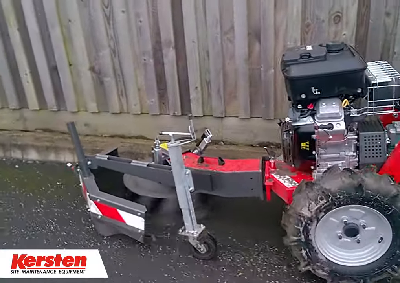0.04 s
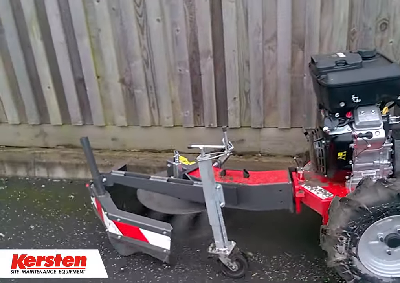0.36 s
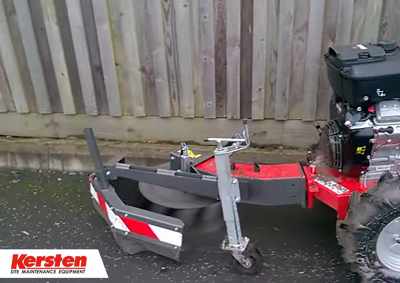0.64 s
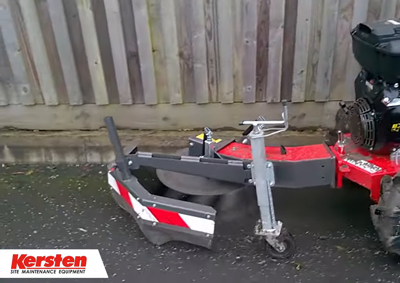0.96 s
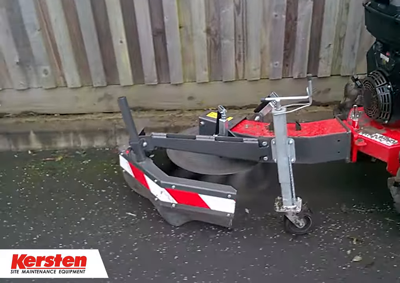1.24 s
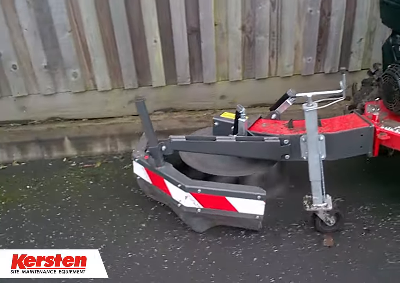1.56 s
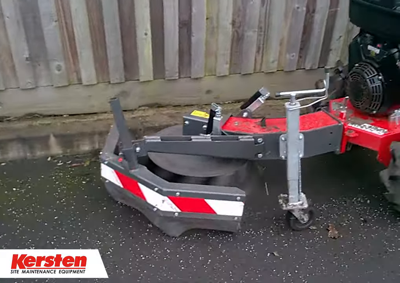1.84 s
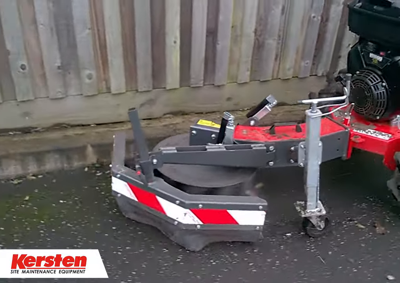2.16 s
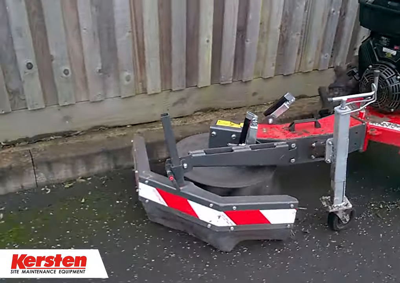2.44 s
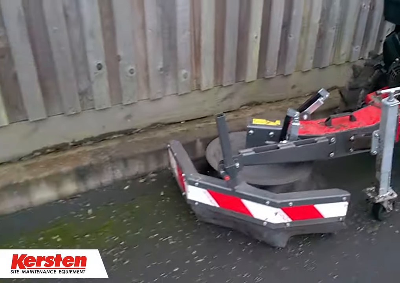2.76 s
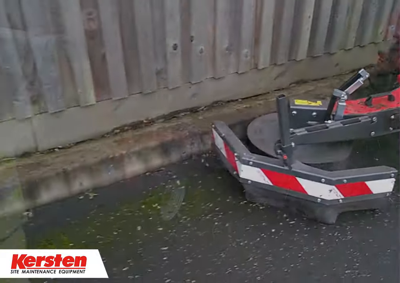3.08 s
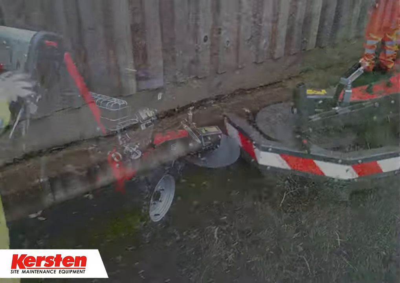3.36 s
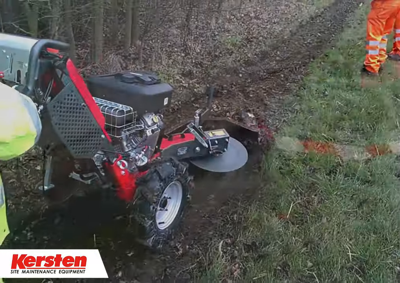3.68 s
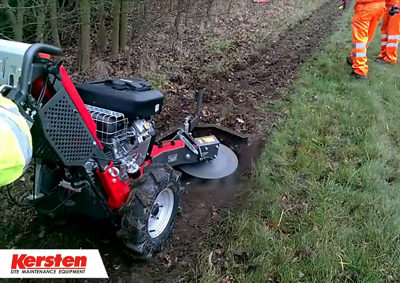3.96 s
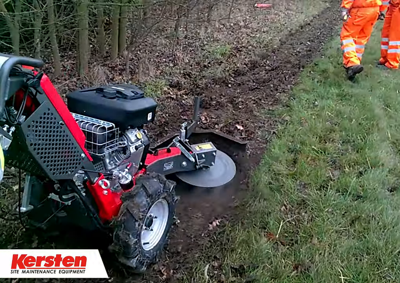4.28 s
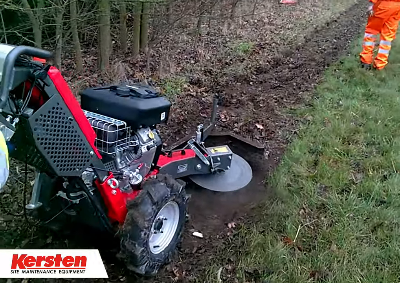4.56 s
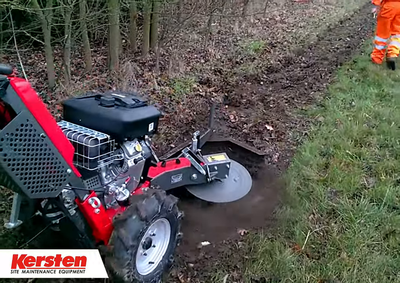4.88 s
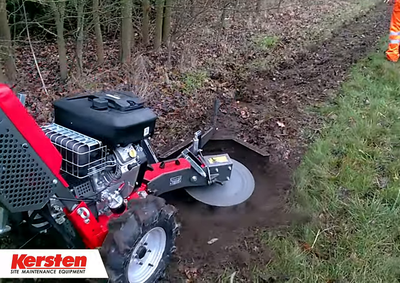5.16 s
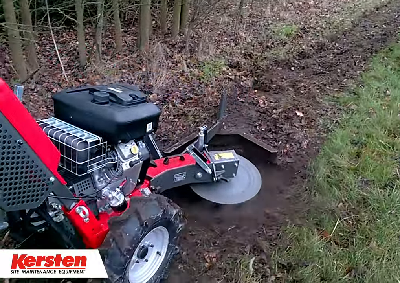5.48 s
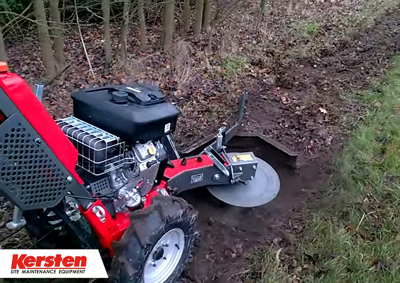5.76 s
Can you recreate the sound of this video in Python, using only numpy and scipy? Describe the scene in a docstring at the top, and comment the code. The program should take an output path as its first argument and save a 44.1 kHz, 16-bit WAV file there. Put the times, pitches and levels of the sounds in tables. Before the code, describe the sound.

From the start, a walk-behind weed brush is heard from the front, outdoors at a kerb. Its twin-cylinder engine throbs low and steady while steel wires scour the asphalt, the bright hiss pulsing about seven times a second with faint metallic ringing. Light gusts nudge the microphone. At about 2.4 seconds everything stops dead, leaving silence. Just before 3 seconds the machine fades quickly back in on a soft verge, closer to the exhaust and louder, with a limping beat, hissing gas and mechanical clatter. The brush swishes softly through soil and leaves, digging in around 4.4, 4.7 and 5.9 seconds. The engine speed dips and recovers slightly as the ground drags at it. Sharp exhaust barks come now and then, hardest from about 4.6 to 5.7 seconds, and the engine keeps labouring until the end, near 6 seconds.

```python
"""A wire brush scours asphalt along a kerb, hissing once a turn over the throb of a V-twin engine.
It is a walk-behind weed brush, heard from the front, with wind nudging the microphone.
The sound stops dead. After a short silence the machine fades in on a soft verge, close by on the
silencer's side: the exhaust barks under load and the brush swishes through soil and leaves."""
import sys
import numpy as np
from scipy import signal
from scipy.fft import rfft, irfft, next_fast_len
from scipy.io import wavfile
from scipy.ndimage import map_coordinates

SR = 44100
rng = np.random.default_rng(int(sys.argv[2]) if len(sys.argv) > 2 else 0)


def wrap_up_sound(samples):
    """Save the sound to the file named by the first command line argument, as 16-bit audio."""
    columns = np.atleast_2d(samples).T
    # keep every value between -1 and 1, then stretch to whole-number steps
    tamed = np.clip(columns, -1, 1)
    steps = np.round(tamed * 32767).astype(np.int16)
    wavfile.write(sys.argv[1], SR, steps)


N = 261072
TIME = np.arange(N) / SR
KERB_HZ, CRUISE_HZ = 24.81, 24.5  # four-stroke cycles a second: governed at the kerb, nominal on the verge
BRUSH_TURNS_PER_CYCLE = .3

# One exhaust puff from the silencer's side. Each row: frequency in Hz, gain in dB.
PUFF_FROM_SIDE = [(10, -68), (25, -23), (48, 3), (75, -2), (122, 1.5), (150, -5), (195, -13.5), (243, -2),
                  (270, -8.5), (310, -15.5), (400, -31), (700, -32), (1500, -68)]


def brush_on_asphalt(cycles):
    """Steel wires scour asphalt, biting harder once a turn as the brush is tilted; disc and guard ring."""
    # How hard the brush presses. Each row: time in seconds, relative level in dB.
    contact = [(0, 0.2), (.42, 0), (.8, -3.5), (1.05, -2.5), (1.36, -5.5), (2, -2.5), (2.36, -5)]
    # The wires' scrape and their finest hiss. Each row: frequency in Hz, gain in dB.
    scrape_spectrum = [(160, -18), (300, -8), (520, -7), (640, -9.5), (850, -7.5), (1300, -10),
                       (2000, -5.5), (2900, -6.5), (3800, -5), (5000, -7), (7000, -5), (10300, -8.5),
                       (13500, -10.5), (16000, -15)]
    fine_spectrum = [(5000, -35), (8500, -3.5), (10300, 2), (12800, -2), (14300, -5.5), (16000, -11.5)]
    # The steel disc and the sheet-metal guard. Each row: resonance in Hz, width in Hz, gain in dB.
    disc_modes = [(437.5, 34, 0)]
    guard_modes = [(556, 65, -3), (786, 87, -1), (962, 35, -0.5)]
    contact_db, = curves(contact)
    bite = np.cos(2 * np.pi * (BRUSH_TURNS_PER_CYCLE * cycles - .4))
    pressure = amp(1.3 * bite + .35 * wobble(70))
    scrape = amp(-31 + .4 * contact_db) * grains(scrape_spectrum, rate=24000, spread_db=.5)
    fine = amp(-32.5 + contact_db) * noise(fine_spectrum)
    disc = amp(-44 + 2.2 * contact_db + .99 * bite) * ringing(disc_modes)
    guard = amp(-49) * ringing(guard_modes)  # steadily flicked by the wires
    return pressure * (scrape + fine) + disc + guard


def kerb_exhaust(first, second):
    """The twin throbs from the front, growing slightly as the machine draws level with the microphone."""
    # One puff from the front. Each row: frequency in Hz, gain in dB.
    front_puff = [(10, -35), (25, -11), (48, 5), (75, -1), (125, -5.5), (150, -8.5), (200, -6.5),
                  (260, -18.5), (325, -20), (600, -37.5), (1500, -72.5)]
    beat = puffs(first, second, first_db=-2.5, scatter_db=0)
    side_share = np.clip(.23 * (TIME - 1.6), 0, 1)  # the silencer starts to come into view
    direct = (1 - side_share) * colour(beat, front_puff) + side_share * colour(beat, PUFF_FROM_SIDE)
    fence_echo = np.interp(TIME - .0082, TIME, direct)  # thrown back by a wooden fence
    return amp(-37 + .3 * TIME) * unit(direct + .35 * fence_echo)


def verge_exhaust(first, second, sag, load):
    """Puffs close to the silencer; an open throttle makes each steeper and richer in overtones."""
    # One puff at full load. Each row: frequency in Hz, gain in dB.
    loaded_puff = [(10, -48), (25, -22), (48, 4), (75, -1), (122, 1.5), (150, -5.5), (195, -2), (243, 1),
                   (268, -4), (305, -10.5), (335, -6.5), (400, -46), (700, -35), (1500, -65)]
    beat = puffs(first, second, first_db=-1.5, scatter_db=.5)
    throb = (1 - load) * colour(beat, PUFF_FROM_SIDE) + load * colour(beat, loaded_puff)
    return amp(-32.5 - .1 * sag) * unit(throb)


def barks(first, sag, load):
    """The first cylinder's blowdown cracks in the silencer, harder when the engine is dragged down."""
    # The hardest firings. Each row: time in seconds, relative level in dB.
    hardest = [(3.255, -20), (3.463, -14.5), (3.545, -17), (4.036, -18), (4.608, -16), (4.694, -18.5),
               (4.735, -13.5), (4.777, -12.5), (4.819, -13.5), (5.113, -12.5), (5.282, -12), (5.365, -14.5),
               (5.447, -11.5), (5.614, -16), (5.655, -13)]
    # The crack in the silencer. Each row: frequency in Hz, gain in dB.
    spectrum = [(150, -17), (400, -19), (580, -6), (740, -14), (860, -2), (960, 4), (1120, -2),
                (1330, -0.5), (1650, -6.5), (2050, -6.5), (2400, -26), (6000, -33), (16000, -51)]
    effort_db = -24 + 4 * load + 4 * sag
    size_db = np.interp(first, TIME, effort_db) + 1.1 * rng.standard_normal(len(first))
    for s, db in hardest:
        size_db[np.argmin(abs(first - s))] = db
    spikes = impulses(first + .0028, amp(size_db))  # just behind the front of the puff
    crack = -colour(spikes, spectrum)
    gas = bursts(spikes, rise=.00038, decay=.0017) * noise(spectrum)
    return amp(23.5) * crack + amp(-12) * gas


def hiss_and_clatter(first, second, sag, load):
    """Gas rushes through the outlet for some milliseconds after each puff, over the engine's clatter."""
    # The outlet's hiss and the clatter. Each row: frequency in Hz, gain in dB.
    hiss_spectrum = [(1180, -28), (2000, -7), (2380, -8.5), (2570, -4.5), (4990, -3.5), (6760, -7.5),
                     (7840, -3.5), (9920, -3), (15100, -15), (16000, -19)]
    clatter_spectrum = [(150, -5.5), (370, -4.5), (450, -4.5), (600, -1), (740, -3.5), (950, 1), (1500, -1),
                        (2000, -4.5), (2800, -10.5), (6000, -35.5)]
    spits = puffs(first + .0021, second + .0022, first_db=1.5, scatter_db=1.5)
    flow = bursts(spits, rise=.0017, decay=.0023)
    hiss = amp(-36.5 + 2.5 * load) * unit(1 + .97 * flow) * noise(hiss_spectrum)
    clatter_gain = amp(-38.5 + 2.5 * load + .5 * sag) * unit(1 + .11 * flow)
    return hiss + clatter_gain * grains(clatter_spectrum, rate=6000, spread_db=1)


def brush_in_soil(cycles):
    """The brush skims soil and leaves, swishing once a turn and digging in now and then."""
    # Each row: middle of a dig in seconds, length in seconds, relative level in dB.
    digs = [(4.4, 0.27, -38.5), (4.67, 0.4, -36), (5.88, .5, -38.5)]
    # Swept soil. Each row: frequency in Hz, gain in dB.
    spectrum = [(1500, -21), (4000, -3.5), (7000, -8), (10500, -3), (12500, -4.5), (16000, -14.5)]
    bite = np.cos(2 * np.pi * BRUSH_TURNS_PER_CYCLE * cycles)
    pressure = amp(-2 + 1.2 * bite + 1.1 * wobble(25))
    return swells(digs, floor_db=-45) * pressure * grains(spectrum, rate=12000, spread_db=3.5)


def wind():
    """Low lumps of air on the microphone at the kerb, and a faint steady rumble on the verge."""
    # Each row: middle of a gust in seconds, length in seconds, relative level in dB.
    gusts = [(.1, .24, -44), (.6, 0.33, -42), (1.05, 0.38, -40.5), (1.31, 0.49, -54), (1.79, .32, -39.5)]
    # Air buffeting the microphone. Each row: frequency in Hz, gain in dB.
    buffet = [(12, -28), (30, -6.5), (55, -3), (100, -4), (180, -9.5), (350, -29), (900, -61.5)]
    lumps = swells(gusts, floor_db=-46.5) * amp(-2 + .8 * wobble(16)) * noise(buffet)
    rumble = amp(-56 + 1.2 * wobble(8)) * noise(buffet)
    return lumps, rumble


def kerb():
    """At the kerb, microphone ahead of the machine: the governor holds the engine steady."""
    cycles, first, second = firings(KERB_HZ + .05 * wobble(8), start=.039, lag=.37)
    return kerb_exhaust(first, second) + brush_on_asphalt(cycles)


def verge():
    """On the verge, microphone close to the silencer: the engine labours as the ground drags at it."""
    # Engine speed. Each row: time in seconds, four-stroke cycles a second.
    engine_speed = [(2.95, 24.81), (3.38, 24.12), (3.82, 24.67), (4.04, 23.89), (4.3, 25.19), (4.62, 23.61),
                    (4.85, 23.92), (5.18, 23.5), (5.34, 24.36), (5.55, 23.98), (5.92, 24.59)]
    # Each row: time in seconds, throttle opening from 0 to 1.
    throttle = [(3, 0), (4.4, 0.16), (4.62, 0.6), (5.2, 0.87), (5.9, 0.95)]
    speed, = curves(engine_speed)
    load, = curves(throttle)
    sag = CRUISE_HZ - speed
    cycles, first, second = firings(speed, start=2.968, lag=.362)
    engine = verge_exhaust(first, second, sag, load) + hiss_and_clatter(first, second, sag, load)
    return engine + brush_in_soil(cycles) + barks(first, sag, load)


def firings(speed, start, lag):
    """Cycle count and both cylinders' firing times; the second follows lag of a cycle behind the first."""
    cycles = np.cumsum(speed) / SR
    cycles -= np.interp(start, TIME, cycles)
    whole = np.arange(np.ceil(cycles[0]), np.floor(cycles[-1]) + 1)
    return cycles, np.interp(whole, cycles, TIME), np.interp(whole + lag, cycles, TIME)


def puffs(first, second, first_db, scatter_db):
    """The limping beat of the twin: two unequal spikes a cycle, their sizes spread by scatter_db."""
    sizes = amp(scatter_db * rng.standard_normal((len(first), 2)))
    return impulses(first, amp(first_db) * sizes[:, 0]) + impulses(second, sizes[:, 1])


def impulses(times, sizes):
    """One spike at each time."""
    return np.bincount(np.clip(np.round(times * SR).astype(int), 0, N), sizes, N + 1)[:N]


def bursts(spikes, rise, decay):
    """Each spike becomes an envelope of its own height that swells and dies away."""
    t = TIME[:SR // 10]
    shape = (1 - np.exp(-t / rise)) ** 2 * np.exp(-t / decay)
    return signal.fftconvolve(spikes, shape / shape.max())[:N]


def grains(points, rate, spread_db):
    """Tiny contacts of random size, rate a second, of rms 1."""
    hits = (rng.random(N) < rate / SR) * rng.standard_normal(N) * amp(spread_db * rng.standard_normal(N))
    return unit(colour(hits, points))


def ringing(modes):
    """Resonances kept sounding by random scraping, of rms 1."""
    f = np.fft.rfftfreq(N, 1 / SR)
    gain = sum(amp(db) / (1 + (2 * (f - hz) / width) ** 2) for hz, width, db in modes)
    return unit(irfft(rfft(rng.standard_normal(N)) * gain, N))


def noise(points):
    """Coloured noise of rms 1."""
    return unit(colour(rng.standard_normal(N), points))


def colour(x, points):
    """x through a causal filter with the given (Hz, dB) response."""
    m = 2 * next_fast_len(N // 2 + SR // 4)
    hz, db = np.transpose(points)
    gain = amp(np.interp(np.log(np.fft.rfftfreq(m, 1 / SR) + 1), np.log(hz), db))
    cepstrum = irfft(np.log(gain), m)
    cepstrum[1:m // 2] *= 2  # folded for minimum phase
    cepstrum[m // 2 + 1:] = 0
    return irfft(rfft(x, m) * np.exp(rfft(cepstrum)), m)[:N]


def swells(rows, floor_db):
    """A steady gain with a smooth swell for each row."""
    return amp(floor_db) + sum(amp(db) * np.cos(np.pi * np.clip((TIME - middle) / length, -.5, .5)) ** 2
                               for middle, length, db in rows)


def wobble(rate):
    """A smooth random curve, rate knots a second."""
    return map_coordinates(rng.standard_normal(int(N * rate / SR) + 4), [TIME * rate])


def curves(rows):
    """One value per sample for each column after the time."""
    times, *columns = np.transpose(rows)
    return [np.interp(TIME, times, column) for column in columns]


def amp(db):
    """Decibels to gain."""
    return 10 ** (np.asarray(db) / 20)


def unit(x):
    """Scaled to rms 1."""
    return x / np.sqrt(np.mean(x ** 2) + 1e-20)


def scene():
    """The kerb stops dead; after a silence the verge fades in. Both ears hear the same."""
    stop_s, return_s = 2.362, 2.944
    fade_out = np.exp(-np.maximum(TIME - stop_s, 0) / .0022)
    fade_in = 1 - np.exp(-np.maximum(TIME - return_s, 0) / .088)
    lumps, rumble = wind()
    sound = fade_out * (kerb() + lumps) + fade_in * (verge() + rumble)
    return np.array([sound, sound])


def record(dry):
    """The highest treble falls away steeply."""
    top_hz, slope_width_hz = 15850, 200
    m = next_fast_len(N + SR // 2)
    gain = np.clip((top_hz - np.fft.rfftfreq(m, 1 / SR)) / slope_width_hz + .5, 0, 1)
    return irfft(rfft(dry, m) * gain, m)[:, :N]


dry = scene()
out = record(dry)
wrap_up_sound(out)
```